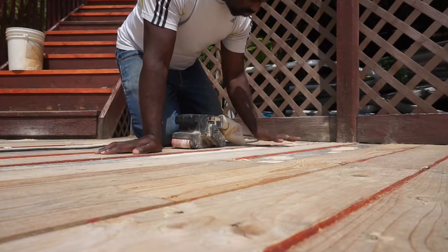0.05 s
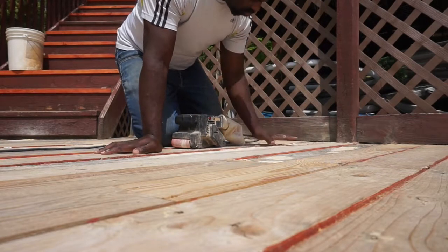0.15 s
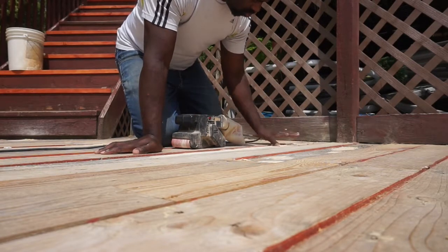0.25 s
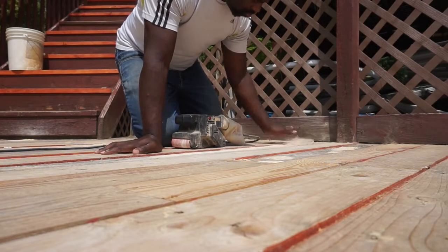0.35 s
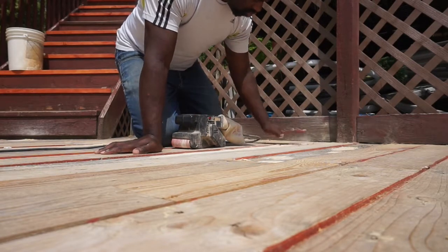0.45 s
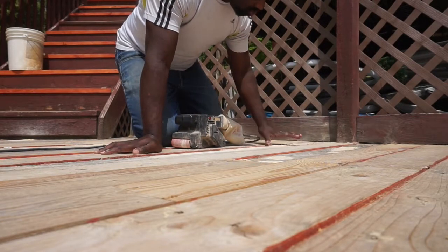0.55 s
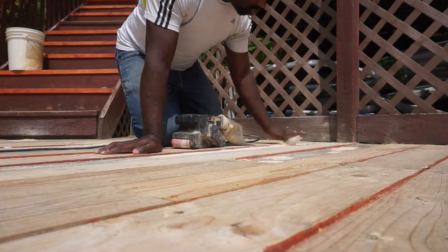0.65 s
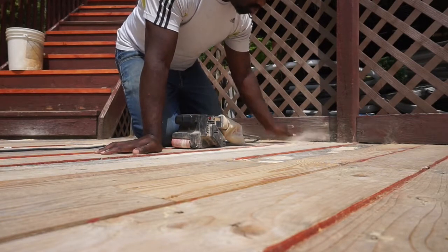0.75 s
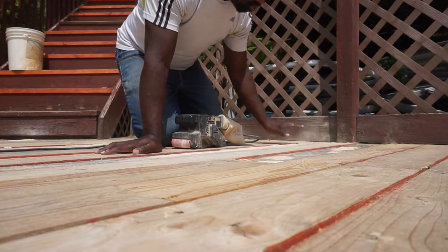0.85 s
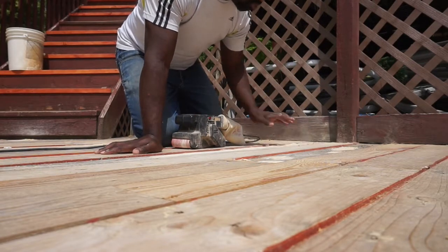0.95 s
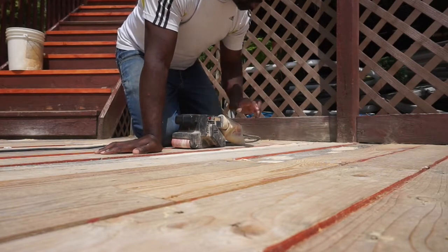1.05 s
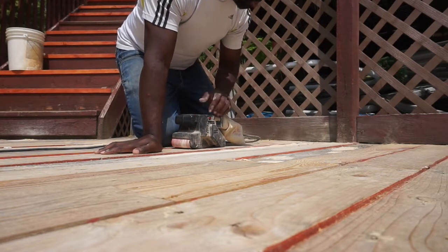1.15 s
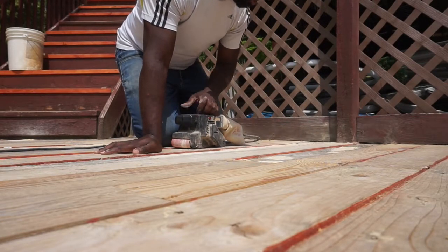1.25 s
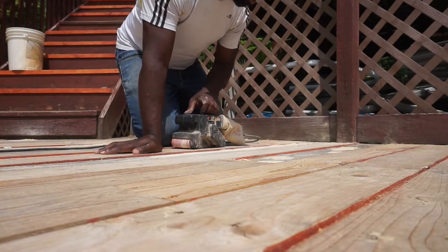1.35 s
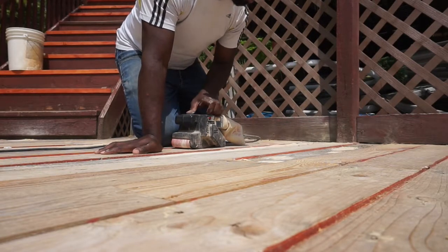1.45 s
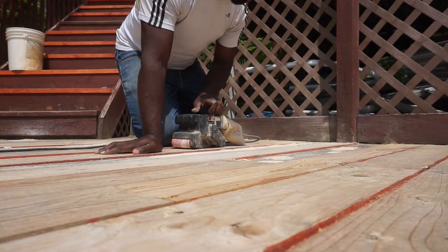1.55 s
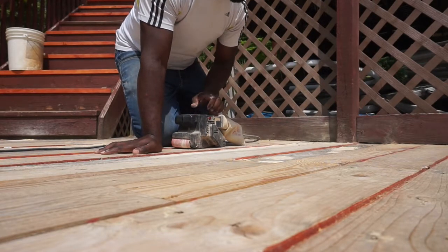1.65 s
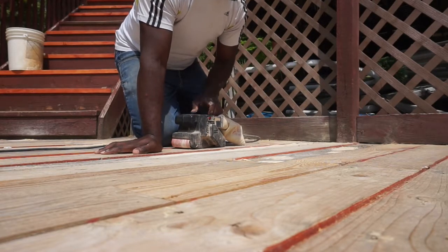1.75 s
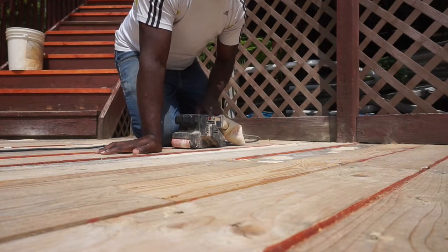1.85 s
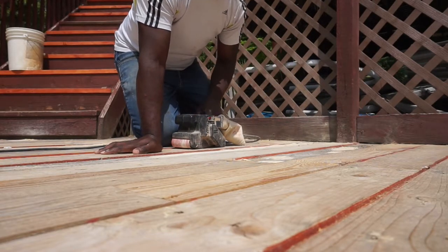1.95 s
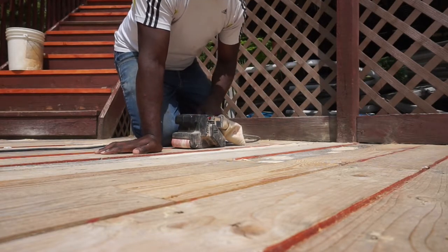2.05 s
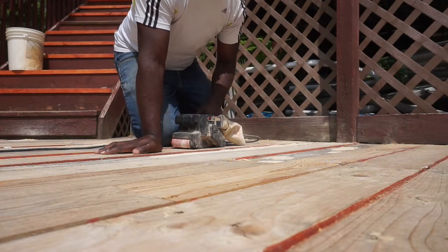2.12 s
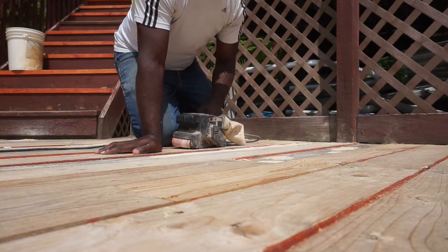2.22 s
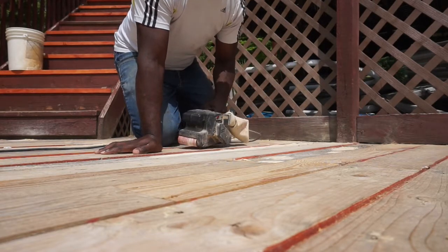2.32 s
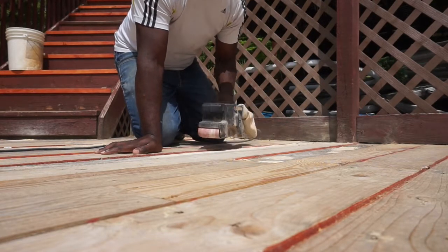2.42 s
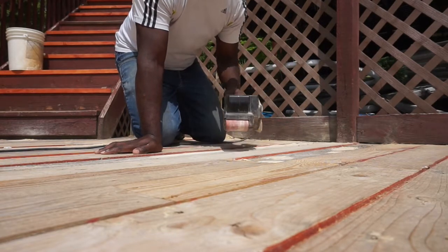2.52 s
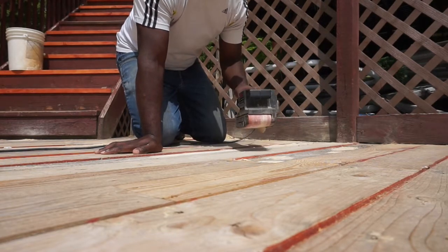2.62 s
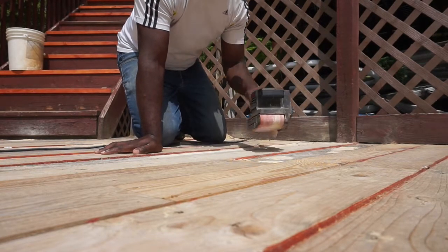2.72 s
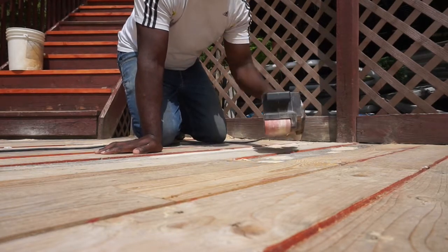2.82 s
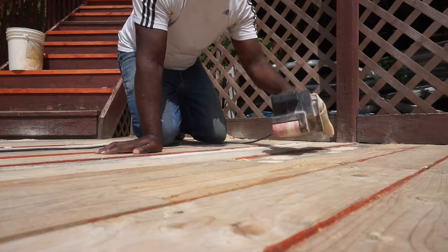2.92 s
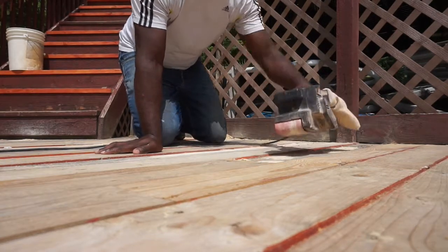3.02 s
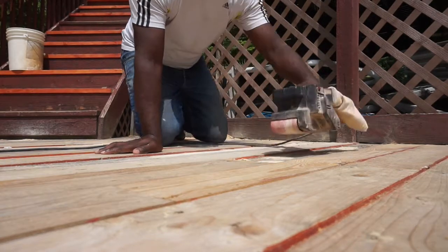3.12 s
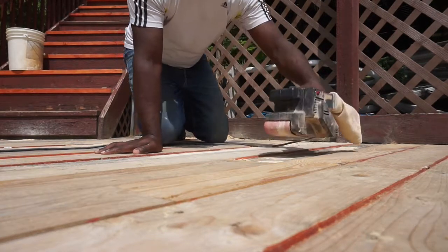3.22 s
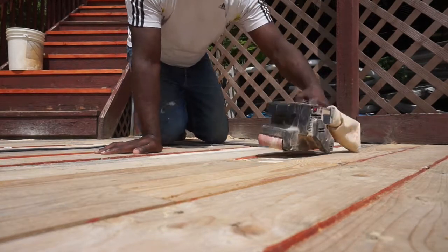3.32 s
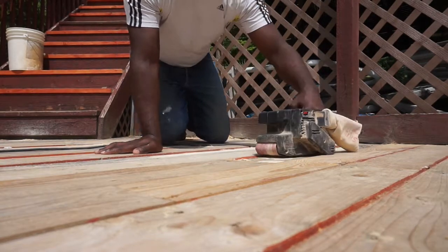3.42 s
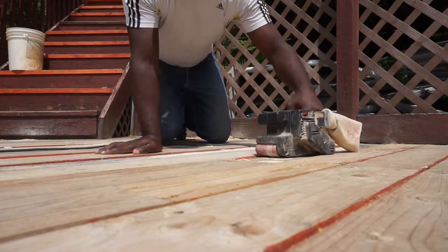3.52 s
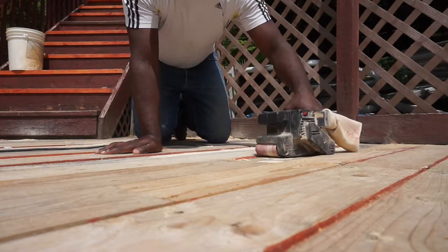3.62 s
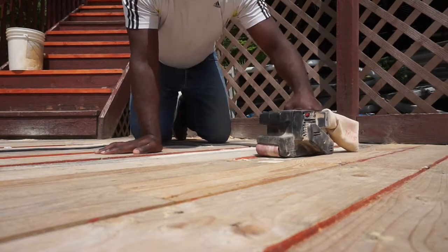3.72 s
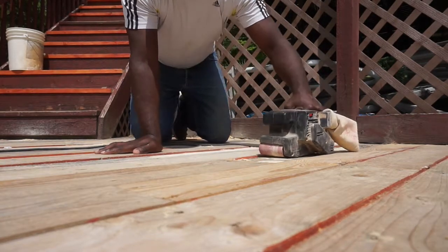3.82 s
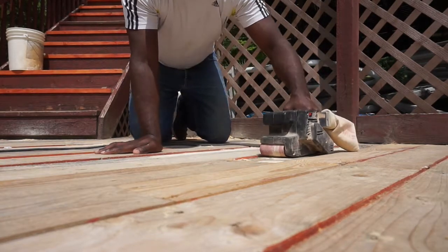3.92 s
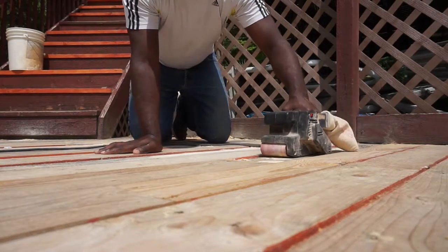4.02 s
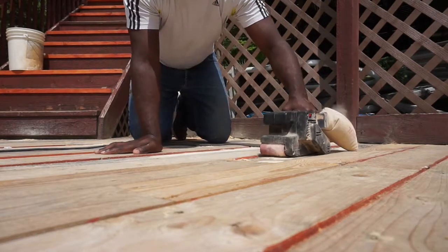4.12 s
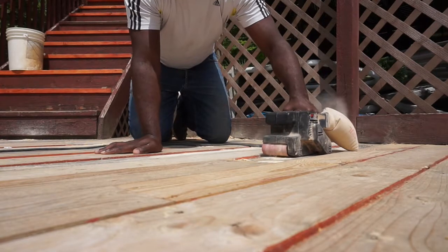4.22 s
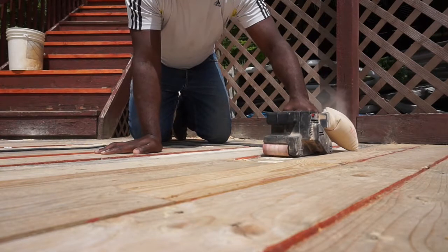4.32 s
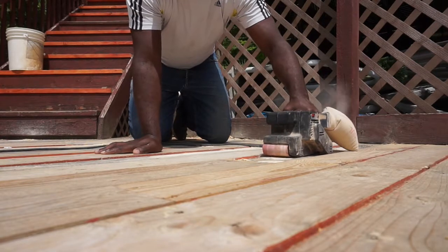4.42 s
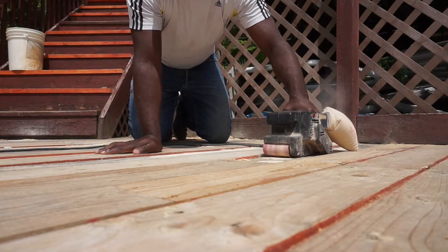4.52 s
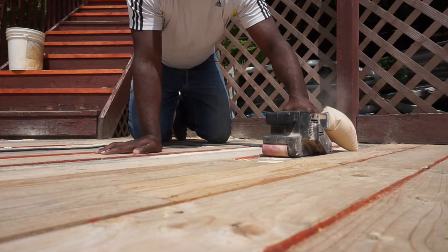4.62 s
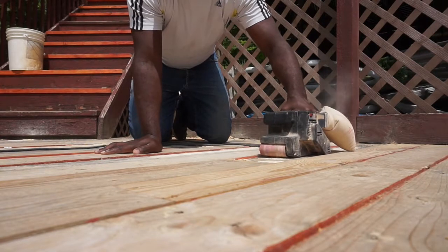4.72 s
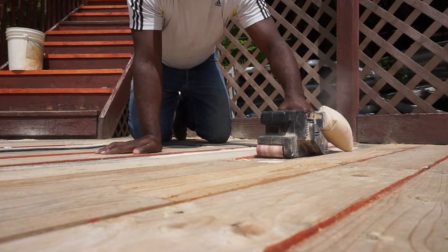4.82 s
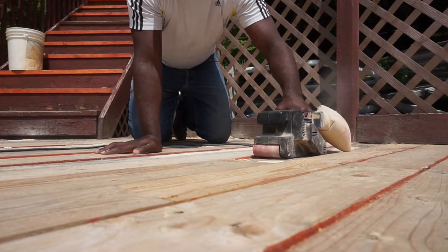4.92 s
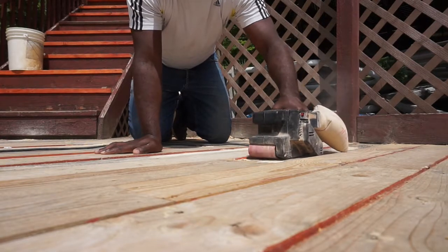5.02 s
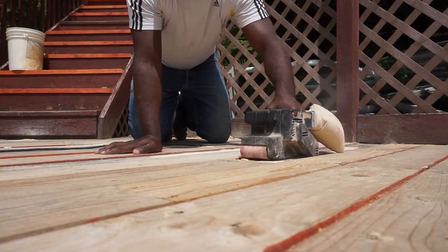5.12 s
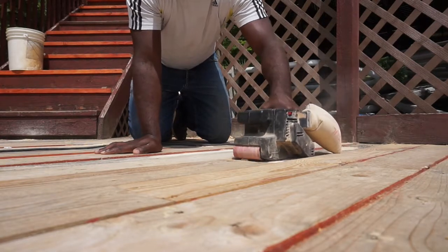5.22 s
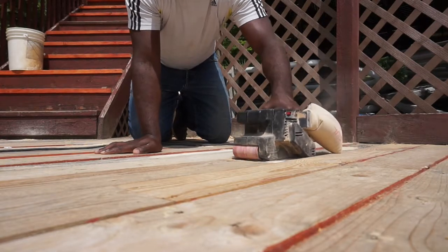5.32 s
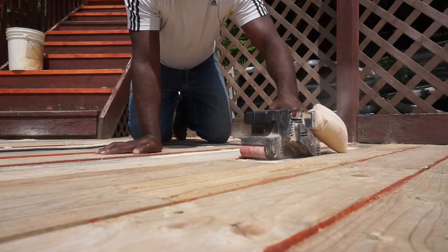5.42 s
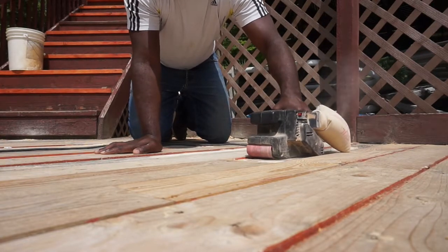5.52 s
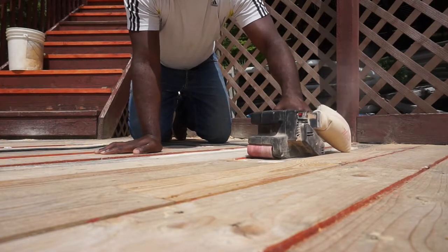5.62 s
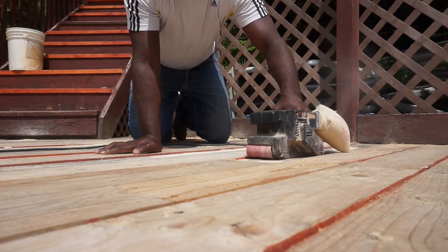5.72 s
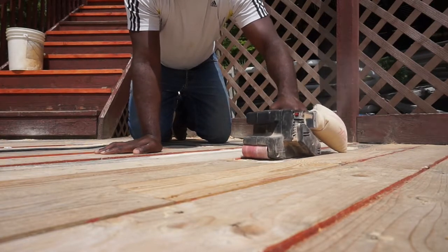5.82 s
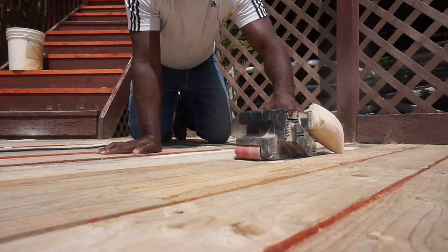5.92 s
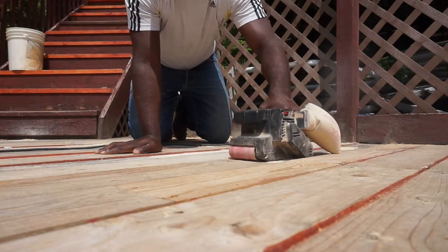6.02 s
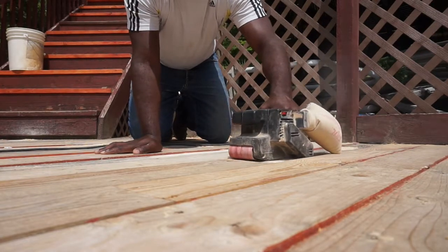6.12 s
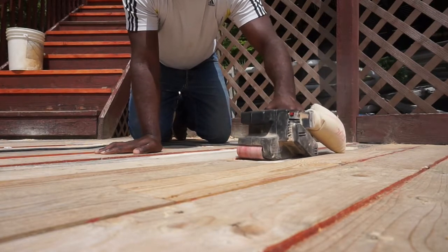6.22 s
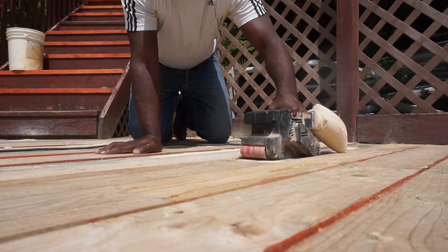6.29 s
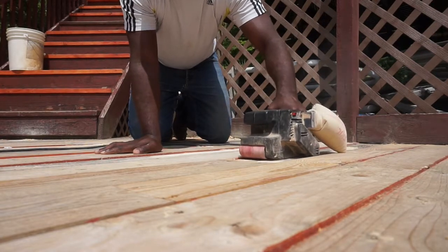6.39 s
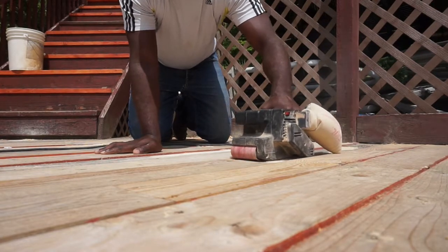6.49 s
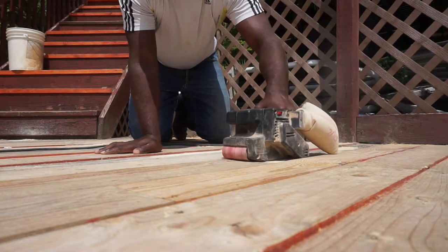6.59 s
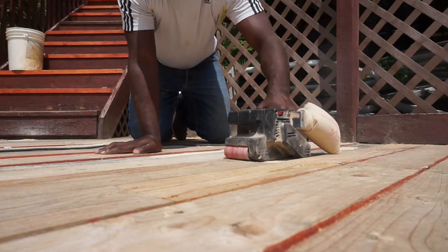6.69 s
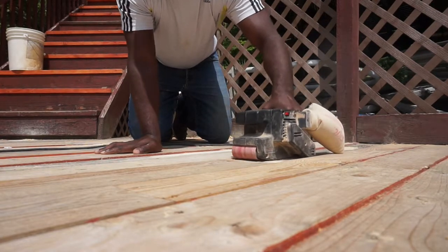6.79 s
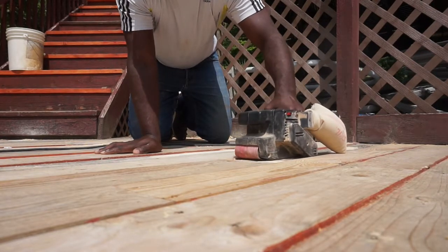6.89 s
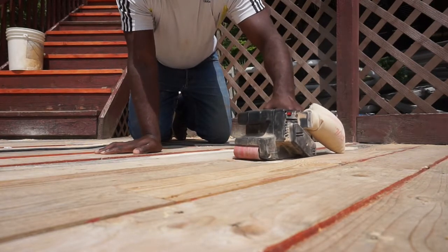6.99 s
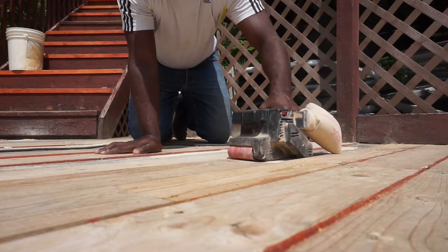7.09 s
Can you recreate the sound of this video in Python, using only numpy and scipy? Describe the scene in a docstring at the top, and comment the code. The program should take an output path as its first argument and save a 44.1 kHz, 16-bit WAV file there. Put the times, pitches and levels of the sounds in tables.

```python
"""A belt sander is set down on a deck, switched on, runs up and sands: tooth harmonics of its drive belt
whine over motor orders, a roller hum, winding buzz, a rattle and the filtered-noise rasp of grit on wood.
Before it a hand brushes the boards; blows ring modes of boards and housing. Two cicada choruses and
a far rumble, all shaped noise, run throughout. Two microphone ports with gain control pick it up."""
import sys
import numpy as np
from scipy import signal
from scipy.fft import rfft, irfft
from scipy.io import wavfile
from scipy.ndimage import uniform_filter1d

SR = 44100
rng = np.random.default_rng(int(sys.argv[2]) if len(sys.argv) > 2 else 0)


def materialize(psi):
    """Save the field psi as 16-bit PCM at rate SR to the path in sys.argv[1].

    A 1-D psi becomes a single channel; in a 2-D psi each row is a channel.
    """
    bounded = np.clip(np.atleast_2d(psi).T, -1, 1)
    quanta = np.round(bounded * 32767).astype(np.int16)
    wavfile.write(sys.argv[1], SR, quanta)


N = 315315

# How the two ports hear near sound, three curves. Each row: frequency in Hz, then in turn
# likeness of the ports (0-1), left over right in dB, phase lead of the left in rad.
NEAR_PORTS = ([(60, 0.99), (180, 0.97), (550, 0.94), (1650, 0.81), (4970, 0.58), (15000, 0.3)], [(60, 0.0),
              (180, 0.5), (550, -1.0), (1650, -4.6), (4970, -5.6), (15000, -2.5)], [(1500, 0), (2500, -1.3),
              (3700, -5), (4400, -6.3), (8100, -6.4), (11300, -7.2), (14000, -6.6)])
# Resonances of the plastic housing. Each row: frequency in Hz, width in Hz, relative level in dB.
HOUSING = [(812, 80, -6), (1055, 65, -5.5), (1285, 113, 2.5), (1680, 140, -7), (2665, 200, -7),
           (4036, 200, 1), (4815, 210, -5), (6415, 370, -10), (11200, 960, -19)]
SWITCH_S, HOP_S = 4.02, 5.32  # motor switched on; machine hops off the wood


def gain_of(db):
    """Decibels to amplitude gain."""
    return 10 ** (np.asarray(db) / 20)


def evened(x):
    """Scales to rms 1."""
    return x / np.sqrt(np.mean(x ** 2) + 1e-20)


def read(points, hz):
    """Reads a frequency curve on a log-frequency axis."""
    f, value = np.transpose(points)
    return np.interp(np.log(hz + 1), np.log(f + 1), value)


def columns(rows):
    """Interpolates every column of a time table, sample by sample."""
    s, *rest = np.transpose(rows)
    return [np.interp(np.arange(N) / SR, s, c) for c in rest]


def drift(hz):
    """Low-passed noise with corner near hz, rms about 1, clipped at 2."""
    step = 64
    noise = rng.standard_normal(N // step + 2000)
    r = np.exp(-2 * np.pi * hz * step / SR)
    slow = signal.filtfilt([1 - r], [1, -r], noise)[1000:-998]
    slow = np.clip(evened(slow), -2, 2)
    return np.interp(np.arange(N) / step, np.arange(len(slow)), slow)


def hiss(spectrum, ports, patchy_db, flicker_db):
    """Random short-time spectra with patches and wide flicker, as the two ports hear them; rms 1."""
    frames, hz = N // 128 + 5, np.fft.rfftfreq(512, 1 / SR)
    a, b, c, d, patches = rng.standard_normal((frames, 257, 5)).T
    patches = uniform_filter1d(patches, size=6, axis=0)
    patches = evened(uniform_filter1d(patches, size=20, axis=1))
    flicker = evened(uniform_filter1d(rng.standard_normal(frames), size=4))
    same, balance_db, lead_rad = (read(p, hz)[:, None] for p in ports)
    same = np.clip(same, -1, 1)
    right, other = a + 1j * b, c + 1j * d
    left = (same * right + np.sqrt(1 - same ** 2) * other) * np.exp(1j * lead_rad)
    z = np.array([left * gain_of(balance_db / 2), right / gain_of(balance_db / 2)])
    z *= gain_of(patchy_db * patches + flicker_db * flicker)
    white = signal.istft(z, nperseg=512, noverlap=384)[1][:, :N]
    colour = gain_of(read(spectrum, np.fft.rfftfreq(N, 1 / SR)))
    return evened(irfft(rfft(white) * colour, N))


def tone(order, turns, hz, db, waver_db):
    """One order of a turning part; wavers at each port as the machine moves among its reflections."""
    balance_db, lead_rad = (read(p, order * hz) for p in NEAR_PORTS[1:])
    angle = 2 * np.pi * order * turns + 0.38 * drift(8.0) + 0.151 * min(order, 12) ** 2
    shared_db = db + waver_db * drift(7.8)
    left_gain = gain_of(shared_db + balance_db / 2 + 2.46 * drift(11.0))
    left = left_gain * np.cos(angle + lead_rad + 0.28 * drift(4.1))
    right = gain_of(shared_db - balance_db / 2) * np.cos(angle)
    return -np.sqrt(2) * np.array([left, right])


def ring(hz, db, t60, chance, t):
    """Decaying modes scaled to peak 1; neighbours start in opposition, chance varies level and phase."""
    loud, phase = chance
    opposition = np.pi * np.arange(len(hz))[:, None]
    envelope = gain_of(db + 1.9 * loud - 60 * t / t60)
    sound = (envelope * np.sin(2 * np.pi * hz * t + opposition + 0.5 * phase)).sum(0)
    return sound / abs(sound).max()


def yard():
    """Two cicada choruses and a far rumble, all shaped noise; a far engine drones inside the rumble."""
    # Each row: time in s, levels of low chorus, high chorus and rumble in dB.
    yard_levels = [(0.0, -41, -42, -58.5), (1.1, -39, -44.5, -56), (3.2, -37, -41.5, -49),
                   (3.6, -38.5, -42.5, -50)]
    # Far sound at the ports, three curves with columns as in NEAR_PORTS.
    far_ports = ([(60, 0.96), (180, 0.92), (550, 0.66), (1650, 0.48), (4970, -0.0), (15000, 0.66)],
                 [(1000, 0)], [(1200, 0), (4800, 1.6), (7800, .4), (10000, 0)])
    # Spectra. Each row: frequency in Hz, relative density in dB.
    low_spectrum = [(470, -37), (800, -21.5), (1070, -16), (1360, 3.5), (1690, -26), (1930, -31),
                    (2600, -37), (3380, -50), (5720, -120)]
    high_spectrum = [(2400, -27), (3020, -22.5), (3900, -7.5), (4700, -8.5), (5800, 1), (7170, -14),
                     (9500, -27.5), (11900, -33), (15700, -60)]
    rumble_spectrum = [(15, -36), (25, -8.5), (93, 3.5), (130, -6.5), (204, -8), (339, -14.5),
                       (1000, -18.5), (1300, -40), (2200, -120)]
    low_db, high_db, rumble_db = columns(yard_levels)
    low = hiss(low_spectrum, far_ports, patchy_db=-0.27, flicker_db=-1.17)
    low = low * gain_of(low_db + 0.19 * drift(22))
    high = gain_of(high_db) * hiss(high_spectrum, far_ports, patchy_db=0.9, flicker_db=0.5)
    hum_hz, hum_db = 101.4, -5  # mean peak level over rumble rms
    hum_angle = 2 * np.pi * hum_hz * np.arange(N) / SR + 1.55 * drift(4.3)
    hum = gain_of(hum_db + 3.5 * drift(3.3)) * np.sin(hum_angle)
    rumble = hiss(rumble_spectrum, far_ports, patchy_db=0.7, flicker_db=1.2)
    return low + high + gain_of(rumble_db) * (hum + rumble)


def brief_swells():
    """Brief sine swells at the pitch of the low chorus."""
    # Each row: onset in s, peak level in dB.
    swell_rows = [(2.128, -30.5), (2.422, -37), (2.656, -37), (2.9467, -26.5), (2.979, -31), (3.836, -29.5)]
    t, swell = np.arange(N) / SR, np.zeros(N)
    for onset_s, db in swell_rows:
        peak_s = onset_s + .002
        width_s = np.where(t < peak_s, .001, .004)
        swell += gain_of(db) * np.exp(-.5 * ((t - peak_s) / width_s) ** 2)
    return swell * np.sin(2 * np.pi * 1350. * t + drift(14))


def sweeps():
    """Bright scuffs: palm sweeps the boards, machine settles, belt skids as it starts or is pressed down."""
    # Each row: centre in s, peak level in dB, Gaussian width in s.
    strokes = [(0.292, -48, 0.015), (0.67, -50, 0.025), (1.228, -54, .004), (3.457, -36, 0.0026),
               (4.077, -27.5, .03), (4.97, -33, 0.017), (5.6, -28, .025)]
    # Each row: frequency in Hz, relative density in dB.
    scuff_spectrum = [(1000, -23), (2500, -2), (6000, 4.5), (9500, -1.5), (13000, -14), (16000, -23)]
    t = np.arange(N) / SR
    swell = sum(gain_of(db) * np.exp(-.5 * ((t - s) / width_s) ** 2) for s, db, width_s in strokes)
    return swell * hiss(scuff_spectrum, NEAR_PORTS, patchy_db=0.5, flicker_db=0.5)


def blows():
    """A contact-long push rings the boards, a jolt the housing; the hollow under the deck prolongs both."""
    # Hand, knee, the machine landing, bouncing and jerking.
    # Each row: start in s, boards level in dB, contact in ms, housing level in dB (before near gain).
    hits = [(1.229, -46, 1.6, -65), (2.28, -40.5, 1.3, -70), (3.392, -14.5, 0.69, -21.5),
            (3.411, -21, 0.26, -20), (3.417, -18, 2.5, -31), (3.438, -33, 0.64, -28.5),
            (3.455, -20.5, 0.7, -34), (4.017, -35, 2, -22.5), (4.033, -33, 1.1, -16.5),
            (4.051, -30, 0.94, -20), (4.064, -34, 0.49, -28), (4.081, -30.5, 2.9, -22.5),
            (5.289, -19.5, 4.5, -31), (5.329, -28, 2.4, -26), (5.357, -26, 7.6, -36)]
    # Each row: mode frequency in Hz, relative level in dB, t60 in s.
    board_modes = [(71, 1, 0.066), (112, -0.5, 0.062), (203, 2, 0.066), (257, 1.5, 0.07), (355, 0, 0.043),
                   (413, -5, 0.036), (527, 3, 0.045), (597, -3, 0.032), (710, 4.5, 0.037)]
    out, t = np.zeros(N), np.arange(8000) / SR
    board_hz, board_db, board_t60 = np.array(board_modes).T[:, :, None]
    case_hz, width_hz, case_db = np.array(HOUSING).T[:, :, None]
    case_db = case_db - 10.0 * np.log2(case_hz / 1000)
    n_boards = len(board_modes)
    # each blow lands on another spot
    spots = rng.standard_normal((len(hits), 2, n_boards + len(HOUSING), 1))
    shakes = rng.standard_normal((len(hits), 1500))
    for (s, wood_db, contact_ms, knock_db), spot, shake in zip(hits, spots, shakes):
        push = np.exp(-.5 * ((t[:800] * 1000 / contact_ms - 1.5) / 0.35) ** 2)
        wood = ring(board_hz, board_db, board_t60, spot[:, :n_boards], t)
        wood = signal.oaconvolve(wood, push / push.sum())[:len(t)]
        case = ring(case_hz, case_db, 1.0 / width_hz, spot[:, n_boards:], t)
        # the parts shake for a few ms
        jolt = signal.lfilter([1], [1, -.7], shake) * np.exp(-t[:1500] / 0.0065)
        case = signal.oaconvolve(case * np.minimum(t / 0.00012, 1), jolt)[:len(t)]
        case /= abs(case).max()
        out[round(s * SR):][:len(t)] += gain_of(wood_db) * wood + gain_of(knock_db) * case
    hollow = signal.lfilter([1], [1, -.96], rng.standard_normal(len(t))) * gain_of(-60 * t / 0.21)
    tail = signal.fftconvolve(out, hollow / np.linalg.norm(hollow))[:N]
    # low cut keeps the blows from booming
    low_cut = signal.butter(3, 50., "high", fs=SR, output="sos")
    return signal.sosfilt(low_cut, out + gain_of(-16.0) * tail) * gain_of([[-.6], [.6]])


def speed(t):
    """Tooth rate in Hz and missing share of speed: run-up to the loaded speed, a brief race at the hop."""
    # Speed the motor holds under the hand's pressure. Each row: time in s, tooth rate in Hz.
    loaded_speed = [(4.4, 1257), (4.6, 1276), (4.87, 1287), (5.29, 1247), (5.55, 1248), (5.87, 1260),
                    (6.45, 1238), (6.75, 1260), (7.14, 1263)]
    after_s = np.maximum(t - HOP_S, 0)
    hop_hz = 39.42 * (1 - np.exp(-after_s / 0.0198)) * np.exp(-after_s / .07)
    run_up_s, run_up_shape = .118, 1.03
    missing = .81 * np.exp(-(np.maximum(t - SWITCH_S, 0) / run_up_s) ** run_up_shape)
    return (columns(loaded_speed)[0] + hop_hz) * (1 - missing), missing


def rattle(hz, on):
    """Loose parts clatter and ring the housing, less as the drive belt gains speed."""
    clacks = rng.random(N) < 1500. / SR  # 1500 per s
    size = gain_of(5.8 * np.minimum(rng.exponential(1, N), 4)) * rng.choice([-1, 1], N) * clacks
    case_hz, width_hz, case_db = np.array(HOUSING).T[:, :, None]
    case_db = case_db - 3.0 * np.log2(case_hz / 1000)
    chance = rng.standard_normal((2, len(HOUSING), 1))
    case = ring(case_hz, case_db, 3.2 / width_hz, chance, np.arange(2000) / SR)
    clatter = evened(signal.oaconvolve(size, case)[:N])
    slack = np.clip(1 - hz / 1680.0, 0, 1) ** 1.18
    return gain_of(-32.0) * on * slack * clatter * gain_of([[-1.5], [1.5]])


def grit_rasp(t, missing):
    """Grit on wood: shaped noise that grows after switch-on; slow grit has little treble."""
    # Each row: frequency in Hz, relative density in dB.
    rasp_spectrum = [(24, -60), (40, -38), (319, -23), (380, -16), (441, -20), (1030, -12), (1310, -6.5),
                     (1980, -19), (2600, -9.5), (3180, -15.5), (4350, -13), (5300, -18.5), (10300, -21),
                     (13900, -28), (15700, -44)]
    rasp_db = -29 - 4 * np.exp(-np.maximum(t - SWITCH_S, 0) / 0.41)
    rasp = gain_of(rasp_db) * hiss(rasp_spectrum, NEAR_PORTS, patchy_db=1.5, flicker_db=0.86)
    dull = signal.sosfilt(signal.butter(2, 2500., fs=SR, output="sos"), rasp)
    return dull + (1 - missing) ** 0.54 * (rasp - dull)


def motor_hum(t, turns, hz, missing):
    """Shaft orders and roller hum grow with speed; the field windings buzz at a multiple of the supply."""
    # Unbalance, fan blades, commutator bars.
    # Each row: multiple of shaft speed, level in dB at final speed (before near gain).
    shaft_orders = [(1, -43.5), (4, -60), (12, -54), (28, -51), (32, -44)]
    shaft_per_tooth, roller_per_tooth, buzz_hz = 3 / 10, .206, 480
    spin_db = 72 * np.log10(hz / hz[-1])
    hum = np.zeros((2, N))
    for k, db in shaft_orders:
        start_db = 14 * np.sqrt(missing) * (drift(37) - 1)
        hum += tone(k * shaft_per_tooth, turns, hz, db + spin_db + start_db, waver_db=1.13 * np.log(2 + k))
    hum += tone(roller_per_tooth, turns, hz, -58.5 + spin_db, waver_db=7.5)
    return hum + tone(buzz_hz, t, np.ones(N), -59.5, waver_db=5.0)


def housing_db(hz):
    """Summed power of the housing resonances at a frequency, in dB."""
    power = sum(gain_of(2 * db) / (1 + (2 * (hz - f) / width_hz) ** 2) for f, width_hz, db in HOUSING)
    return 10 * np.log10(power)


def belt_whine(t, turns, hz, missing):
    """Tooth harmonics, coloured by the housing in the run-up and swung by out-of-round pulleys."""
    # Swells and dips as the machine moves among its reflections (levels before near gain).
    # Each row: time in s, levels of harmonics 1, 3 and 5 in dB.
    odd_levels = [(4.1, -26.5, -29.5, -37), (4.19, -19.5, -26, -37.5), (4.35, -30.5, -36.5, -33),
                  (4.6, -29, -33, -40.5), (4.85, -26, -35.5, -35), (5.25, -30, -32.5, -39),
                  (5.43, -27, -34, -37.5), (5.65, -33.5, -32, -34.5), (6.05, -24.5, -37, -38.5),
                  (6.38, -29.5, -36.5, -33), (6.55, -22.5, -34, -35.5), (6.66, -31.5, -30, -42),
                  (6.8, -22.5, -29, -40), (6.95, -26.5, -29, -40), (7.15, -22, -34.5, -41)]
    # Each row: time in s, level of harmonic 6 in dB.
    sixth_levels = [(4.5, -54), (5.1, -42), (5.3, -55.5), (7.1, -49)]
    # Each row: multiple of the tooth rate, level in dB.
    steady_teeth = [(2, -30), (4, -37), (7, -50), (8, -47.5), (9, -50.5)]
    # Each row: pulley turns per tooth, swing depth (0-1).
    run_out = [(1 / 8, 0.057), (1 / 10, 0.13)]
    slack = np.sqrt(missing)
    hop_dip_db = -1.5 * np.exp(-.5 * ((t - HOP_S) / 0.018) ** 2)  # per harmonic number
    moving_teeth = list(zip((1, 3, 5, 6), columns(odd_levels) + columns(sixth_levels)))
    teeth = np.zeros((2, N))
    for k, db in moving_teeth + steady_teeth:
        # a harmonic swells as it crosses a housing resonance
        colour_db = 0.68 * (housing_db(k * hz) - housing_db(k * hz[-1]))
        # a slack belt whines weaker, duller and unevenly
        slack_db = slack * (-8.5 - 3 * max(k - 6, 0) + 0.95 * k * drift(45))
        waver_db = 0.32 * min(k, 7) + 1.5 * (k > 5) * (1 - slack)
        teeth += tone(k, turns, hz, db + k * hop_dip_db + colour_db + slack_db, waver_db)
    swing = 1 + sum(depth * np.cos(2 * np.pi * rate * turns + drift(3.5)) for rate, depth in run_out)
    swing += 0.21 * drift(26)  # slow uneven swing of the whole whine
    return teeth * swing


def sander():
    """Belt teeth, motor, rattle and rasp follow one speed; the winding buzz keeps its pitch."""
    t = np.arange(N) / SR
    hz, missing = speed(t)
    on = np.clip((t - SWITCH_S + 0.0038) / 0.01, 0, 1)
    # the load trembles, a slack belt judders
    tremble = 0.001475 * drift(8.14) + 0.05 * missing * drift(90.5)
    turns = np.cumsum(hz * (1 + tremble)) / SR  # in teeth
    machine = belt_whine(t, turns, hz, missing) + motor_hum(t, turns, hz, missing)
    return on * (machine + grit_rasp(t, missing)) + rattle(hz, on)


def scene():
    """The sander and blows with the near gain of 8.5 dB, over yard, brief swells and sweeps."""
    return yard() + brief_swells() + sweeps() + gain_of(8.5) * (blows() + sander())


def record(dry):
    """Bass cut; gain control falls at once on loud sound and creeps back; then a band limit."""
    dry = signal.sosfilt(signal.butter(1, 40., "high", fs=SR, output="sos"), dry)
    step = 44  # samples, about 1 ms
    power = uniform_filter1d((dry ** 2).mean(0), size=441)[::step]
    power_db = 10 * np.log10(abs(power) + 1e-12)
    wanted_db = .5 * np.maximum(power_db + 31.0, 0)  # 2:1 above -31 dB
    keep = np.exp(-.001 / 0.3)  # release 0.3 s
    cut_db = np.zeros(len(wanted_db))
    for k in range(1, len(cut_db)):
        cut_db[k] = max(wanted_db[k], keep * cut_db[k - 1])
    cut_db = uniform_filter1d(cut_db, size=8)
    cut_db = np.interp(np.arange(N) / step, np.arange(len(cut_db)), cut_db)
    band_limit = signal.firwin(511, 15800, window=("kaiser", 9), fs=SR)
    return signal.oaconvolve(dry / gain_of(cut_db), band_limit[None], "same")


dry = scene()
out = record(dry)
materialize(out)
```